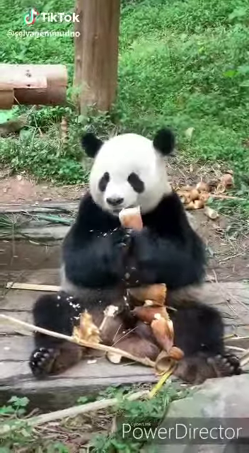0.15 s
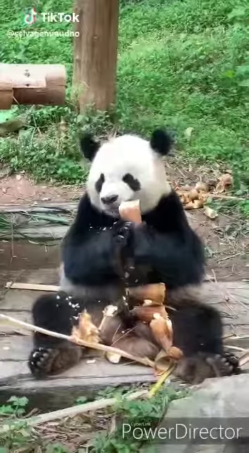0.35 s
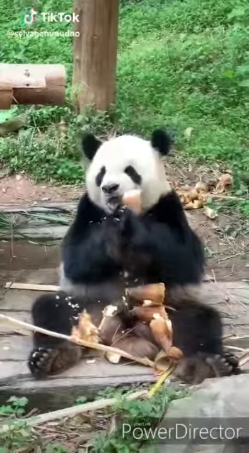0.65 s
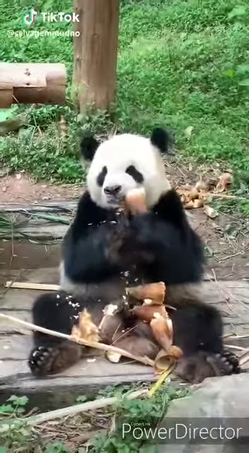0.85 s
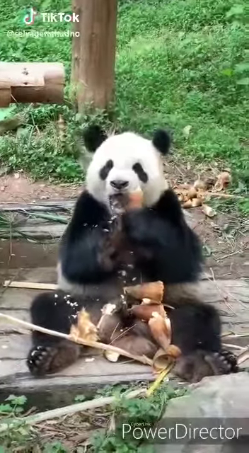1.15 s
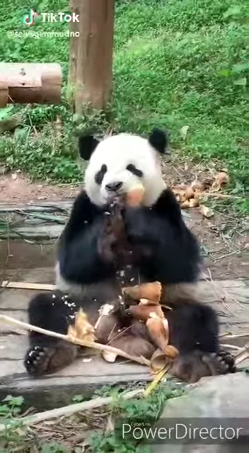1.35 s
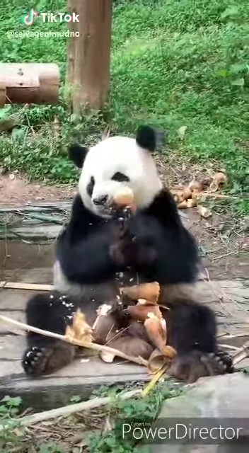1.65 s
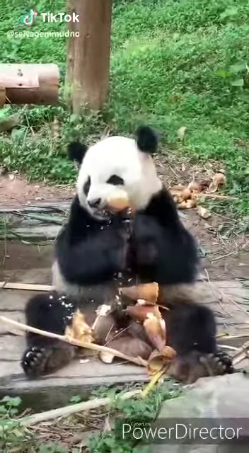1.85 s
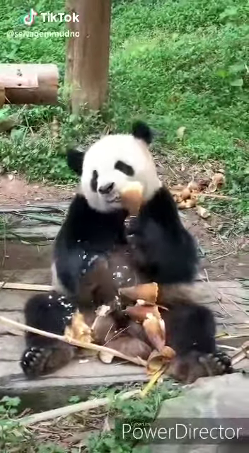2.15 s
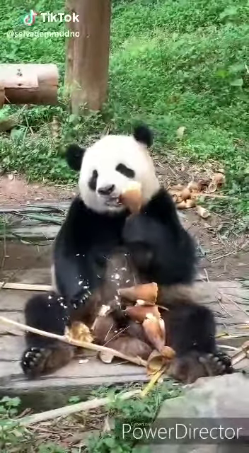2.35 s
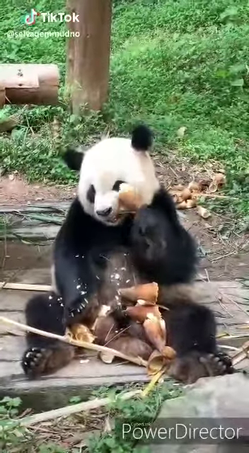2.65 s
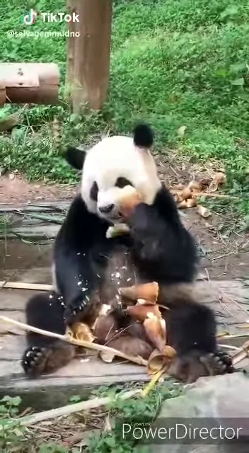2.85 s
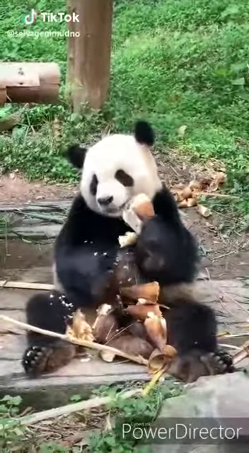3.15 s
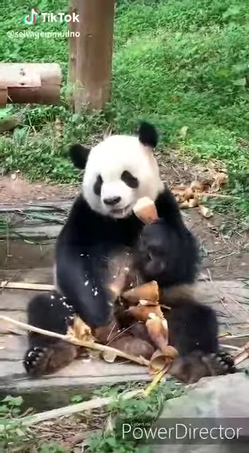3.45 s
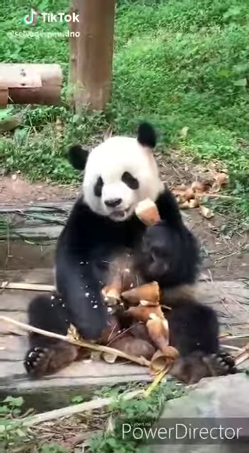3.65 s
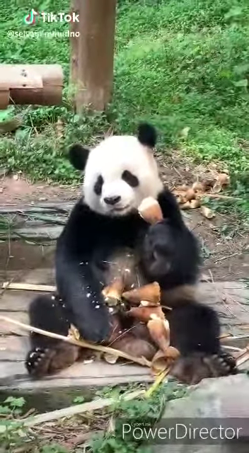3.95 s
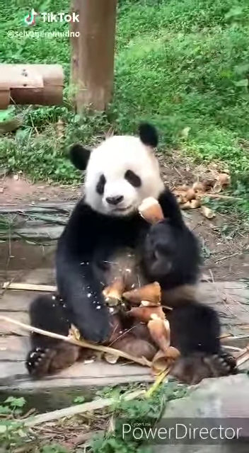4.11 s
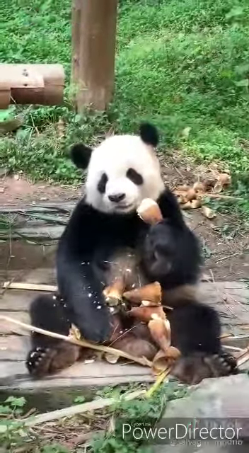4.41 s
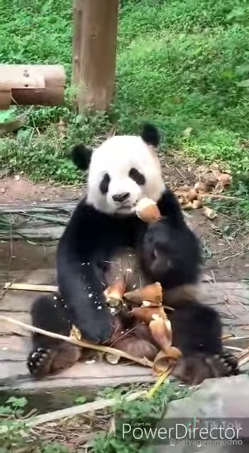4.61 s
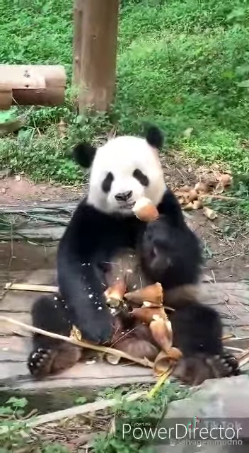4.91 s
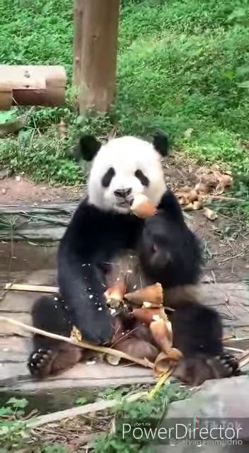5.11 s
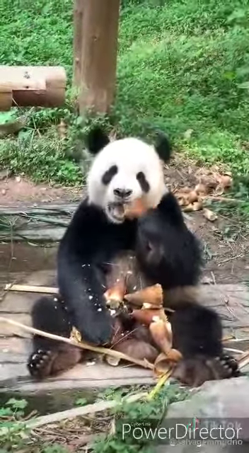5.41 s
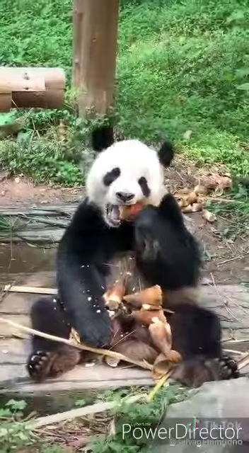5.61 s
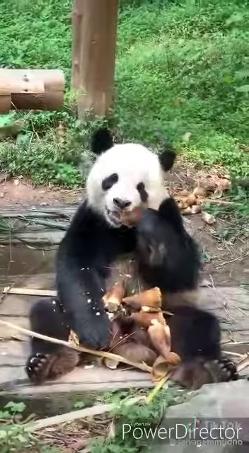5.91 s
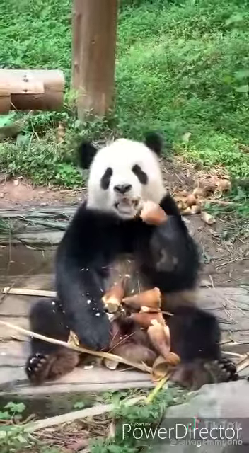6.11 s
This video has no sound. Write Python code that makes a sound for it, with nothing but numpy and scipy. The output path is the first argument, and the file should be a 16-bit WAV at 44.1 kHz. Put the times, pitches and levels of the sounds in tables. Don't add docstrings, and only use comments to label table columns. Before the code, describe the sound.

Crunching, brittle chewing dominates, bright and dry with a small hollow mouth tone. Early nips and snaps thin into softer grinding, then the loudest crack bursts out, followed by sparse chews, a low bump on the microphone and a tight flurry of snaps. Regular crunches finish it. Quiet open-air stereo hiss and far machinery rumble stay beneath, with almost no echo.

```python
import sys
import numpy as np
from scipy import signal
from scipy.io import wavfile
from scipy.ndimage import uniform_filter1d

SR = 44100
rng = np.random.default_rng(int(sys.argv[2]) if len(sys.argv) > 2 else 0)


def unload_wav(signal):
    wavfile.write(
        sys.argv[1],
        SR,
        np.round(np.clip(np.atleast_2d(signal).T, -1, 1) * 32767).astype(np.int16),
    )


def volts(x):
    e = np.asarray(x, float) / 20
    return 10 ** e


N = 276490

# contact in seconds, length in seconds, crush level in dB, cavity level in dB,
# cavity pitch in Hz.
CHEWS = [(0.121, 0.092, -34, -36.5, 1300), (0.752, 0.093, -41, -40, 992), (0.951, 0.066, -36.5, -40, 885),
         (1.11, 0.034, -47, -49, 748), (1.151, 0.11, -50.5, -42, 757), (1.369, 0.087, -44, -41, 840),
         (1.586, 0.048, -49, -55, 990), (1.939, 0.079, -23, -34, 1267), (2.366, 0.084, -47, -44.5, 920),
         (2.546, 0.092, -37, -40, 970), (2.755, .07, -42, -44, 940), (3.453, 0.11, -33.5, -36.5, 1890),
         (4.064, 0.085, -42, -38.5, 1810), (4.482, 0.082, -33, -36, 1310), (4.701, 0.074, -37, -37.5, 1440),
         (4.904, 0.072, -39, -39, 1280), (5.106, 0.085, -37.5, -36.5, 1490), (5.316, 0.12, -46, -42, 1520),
         (5.521, 0.065, -31, -41, 1810), (5.726, 0.076, -42.5, -44, 1430),
         (5.938, 0.035, -37.5, -40.5, 1600), (6.141, 0.1, -42, -40, 1144)]
# [s, s, dB, dB, Hz].
BITES = [(-0.028, 0.3, -41.5, -40, 1030), (0.281, 0.03, -51, -41.5, 1580), (0.351, .055, -46.5, -41, 1060),
         (2.042, 0.074, -36.5, -51, 1210), (3.662, 0.068, -35.5, -36, 1790),
         (4.288, 0.085, -39, -41.5, 1146), (4.335, .04, -42, -46, 1100), (0.548, 0.087, -29.5, -35, 1170),
         (2.982, 0.1, -36, -41, 900), (3.243, 0.073, -27.5, -31, 840), (3.882, 0.07, -26, -34.5, 1730),
         (5.982, 0.027, -37.5, -39, 1190), (5.507, 0.035, -45, -41.5, 1810)]
# [s, s, dB, dB, Hz].
NIPS = [(0.46, 0.0077, -42, -34, 900), (0.38, 0.011, -37, -44.5, 1100), (0.427, 0.0051, -45, -38, 1340),
        (0.462, 0.0047, -50, -38.5, 1730), (0.53, 0.0055, -44, -32.5, 1700), (1.8, 0.028, -48.5, -57, 880),
        (3.183, 0.023, -44, -49, 1405), (1.787, 0.013, -36, -38.5, 1140), (2.347, .012, -40, -40.5, 1400),
        (2.012, .04, -34, -42, 1240), (3.206, 0.006, -28, -28, 2030), (3.215, .004, -26, -29, 1270),
        (3.269, .01, -34, -40, 940), (3.292, 0.0073, -34.5, -36.5, 870), (3.226, 0.013, -24, -31, 1140)]
# peak in seconds, peak level in dB, ring in Hz, cavity knock in dB.
SNAPS = [(0.1666, -17.5, 4480, -36), (0.348, -24.5, 9800, -32), (0.4176, -27.5, 5300, -37),
         (0.4203, -26, 2310, -20), (0.4622, -29, 3280, -28), (0.4893, -33, 6650, -28),
         (0.5443, -14.5, 5800, -22), (0.9601, -28, 10140, -33), (0.9693, -19, 10140, -21.5),
         (1.7888, -28, 5400, -30), (1.7928, -22, 7600, -22), (1.9412, -8, 10800, -10.5),
         (1.9466, -15.5, 5470, -25), (1.954, -6.5, 4550, -11.5), (1.9815, -19, 12000, -23),
         (2.603, -22.5, 5700, -23.5), (2.9967, -13.5, 6740, -22), (3.205, -27, 6000, -26),
         (3.2083, -11, 7500, -18), (3.2095, -15.5, 2400, -22), (3.2155, -17, 6750, -30),
         (3.2257, -26, 6160, -27), (3.2343, -8.5, 7060, -20), (3.2463, -12, 11000, -30),
         (3.2507, -11.5, 5160, -24), (3.2525, -17, 2380, -6), (3.2813, -16, 4970, -23),
         (4.695, -18, 10800, -19.5), (3.4593, -14.5, 11500, -28), (3.506, -26, 5000, -19),
         (3.8805, -20, 5750, -16.5), (4.3087, -26, 5730, -26), (4.5054, -22, 10000, -17),
         (5.5241, -20, 10200, -25), (5.7243, -16, 7800, -24), (5.9884, -19.5, 4400, -26),
         (5.936, -26, 10500, -32)]
# peak in seconds, peak level in dB,
# ring in Hz.
MORE_SNAPS = [(0.1225, -22, 6400), (0.3873, -25, 4800), (0.012, -29, 4050), (0.2834, -35, 3980),
              (0.3415, -33, 10500), (0.429, -34, 9500), (0.487, -30, 5000), (0.537, -20, 11900),
              (0.5716, -23, 6250), (0.5838, -23.5, 9100), (0.791, -26.5, 5240), (1.1211, -28, 11090),
              (1.2888, -34, 11040), (1.5, -36, 5200), (1.9365, -21, 11400), (1.965, -16, 5100),
              (1.97, -18, 11540), (1.975, -19, 11000), (2.0142, -21, 4570), (2.026, -21, 4530),
              (2.032, -20, 12000), (2.0407, -12.5, 3700), (2.352, -28, 10840), (3.2283, -15, 2370),
              (3.227, -17, 5540), (3.2382, -19, 2500), (3.271, -27, 9500), (3.292, -27, 4700),
              (3.449, -29, 11480), (3.4758, -20, 5300), (3.487, -23, 4940), (3.491, -26.5, 4700),
              (3.585, -37, 10500), (3.5952, -35, 11100), (3.884, -14.5, 5290), (3.903, -15, 5760),
              (3.981, -37, 7860), (4.2149, -40, 6130), (4.6977, -23, 10400), (4.71, -25, 8200),
              (4.7215, -27, 10200), (4.7768, -32, 10300), (4.787, -32, 4070), (4.791, -35, 4040),
              (4.919, -22, 10500), (5.5098, -31, 11000), (5.5673, -26.5, 5100)]
# peak in seconds, peak level in dB.
KNOCKS = [(1.102, -24), (1.108, -21.5), (1.143, -28), (1.167, -32), (1.178, -29), (1.189, -25),
          (1.196, -30), (1.9865, -24), (1.4, -24.5), (3.295, -25), (3.66, -38), (4.063, -24), (4.074, -24),
          (4.083, -26), (4.291, -27), (4.907, -22), (5.1051, -27), (6.1467, -15.5)]
# frequency in Hz, density in dB per Hz.
FIBRE_SPECTRUM = [(1290, -32), (2200, 3), (2900, -11.5), (4420, 12), (6710, 6.5), (7310, 2.5), (9070, -3.5),
                  (11600, 5), (13300, -18.5), (14000, -33)]
# time in seconds, level in dB.
HUSK = [
    (0, -47),
    (0.12, -46),
    (0.2, -47),
    (0.262, -49),
    (0.283, -39.5),
    (0.3, -47),
    (0.32, -64),
    (0.34, -90),
]
# side heard (0 left, 1 right), lag in seconds, level in dB.
ECHOES = [(0, 0.0034, -13.5), (1, 0.0043, -25.5), (0, 0.011, -32.5),
          (1, 0.014, -48), (0, 0.022, -51), (1, 0.028, -48)]
# time in seconds, hum pitch in Hz, hum level in dB, rumble level in dB.
DRONE = [(0.0, 51.5, -70, -34.5), (0.16, 62.3, -61, -37.5), (0.44, 61.6, -44, -38), (0.54, 57.5, -42, -41),
         (2.46, 57.84, -42, -39), (2.6, 54, -35, -41.5), (2.79, 57, -44, -38), (3.21, 57, -45.5, -41),
         (4.85, 60.0, -39, -39.5), (4.98, 60.3, -44, -38.5), (5.46, 61.5, -57, -41), (5.55, 62.8, -47, -38),
         (5.83, 61.3, -37.5, -42), (6.16, 62.1, -50, -38), (6.27, 60.3, -40, -40)]
# centre in Hz, width in Hz, level in dB.
HOUSING_MODES = [(97.36, 2.3, -0.5), (139.2, 18.5, -5.5), (234.8, 17.7, -5.5), (294.4, 5.7, -9),
                 (435.7, 8.5, -12.5)]
# frequency in Hz, density in dB per Hz.
AIR_SPECTRUM = [(15, -37), (25, -5.5), (70, -5.5), (113, 2), (363, -12), (554, -11), (991, -19.5),
                (1230, -17), (1780, -20.5), (2570, -24.5), (4250, -27), (8930, -35.5), (10700, -32.5),
                (12600, -60), (14000, -82)]
# frequency in Hz, correlation from -1 to 1.
LIKENESS = [(60, 1.0), (150, 1), (370, 0.74), (910, 0.022), (2250, -0.49), (5580, -0.28), (13800, -0.1)]
# time in seconds, thump level in dB.
GUST = [
    (2.48, -65),
    (2.58, -32.5),
    (2.696, -43),
    (2.75, -50),
]

CHEW_RISE_S, CHEW_HOLD_SHARE, CHEW_SAG_DB, CHEW_FALL_DB = 0.011, 0.4, 2.5, 15
BITE_RISE_S, BITE_HOLD_SHARE, BITE_SAG_DB, BITE_FALL_DB = 0.025, 0.5, 9, 20.5
NIP_RISE_S, NIP_HOLD_SHARE, NIP_SAG_DB, NIP_FALL_DB = 0.0045, 0.86, -1.5, 24
ONSET_DB = 24
MOUTH_FADE_DB_PER_S = 29
BRIGHT_DB, DULLING_DB_PER_S = -0.6, 38.5
FRONT_DULL_DB = 1
CONTACT_DB, CONTACT_HZ, CONTACT_KNOCK_DB = 4.5, 10500, 7
TICK_KNOCK_DB = -34
KNOCK_RING_S, KNOCK_CRACK_DB = 0.0016, -25.5
THROAT_HZ, THROAT_DB, THROAT_KNOCK_DB = 773, -5.5, -4.5
HUSK_HZ, HUSK_WIDTH_HZ = 3420, 1700


def rms_one(x):
    return x / np.sqrt(np.mean(x ** 2) + 1e-20)


def in_time(rows):
    s, *columns = np.transpose(rows)
    return [np.interp(np.arange(N) / SR, s, c) for c in columns]


def at_hz(points, hz):
    point_hz, value = np.transpose(points)
    return np.interp(np.log(hz), np.log(point_hz), value)


def drift(rate_hz):
    r = np.exp(-2 * np.pi * rate_hz * 40 / SR)
    slow = signal.lfilter([1], [1, -2 * r, r * r], rng.standard_normal(N // 40 + 2002))[2000:]
    return np.interp(np.arange(N) / 40, np.arange(len(slow)), rms_one(slow))


def resonate(x, hz, width_hz):
    r = np.exp(-np.pi * width_hz / SR)
    poles = [1, -2 * r * np.cos(2 * np.pi * hz / SR), r * r]
    return signal.lfilter([(1 - r * r) / 2, 0, (r * r - 1) / 2], poles, x + 1e-18)


def band_noise(white, low_hz, high_hz):
    return signal.sosfilt(signal.butter(2, [low_hz, high_hz], "band", fs=SR, output="sos"), white)


def clicks(per_s, spread_db):
    sizes = volts(spread_db * np.minimum(rng.exponential(1, N), 4)) * rng.choice([-1, 1], N)
    return sizes * (rng.random(N) < per_s / SR)


def strokes(rows, rise_s, hold_share, sag_db, fall_db):
    out, t = np.zeros((2, N)), np.arange(N) / SR
    for s, length_s, crush_db, mouth_db, _ in rows:
        on = slice(max(round((s - rise_s) * SR), 0), round((s + length_s) * SR))
        corners_s = s + np.array([-rise_s, 0, hold_share * length_s, length_s])
        shape_db = np.interp(t[on], corners_s, [-ONSET_DB, 0, -sag_db, -fall_db])
        mouth_fade_db = MOUTH_FADE_DB_PER_S * np.maximum(t[on] - s, 0)
        out[0, on] += volts(shape_db + crush_db)
        out[1, on] += volts(shape_db + mouth_db - mouth_fade_db)
    return uniform_filter1d(out, size=100, axis=1)


def jaw():
    force, mouth = (strokes(CHEWS, CHEW_RISE_S, CHEW_HOLD_SHARE, CHEW_SAG_DB, CHEW_FALL_DB)
                    + strokes(BITES, BITE_RISE_S, BITE_HOLD_SHARE, BITE_SAG_DB, BITE_FALL_DB)
                    + strokes(NIPS, NIP_RISE_S, NIP_HOLD_SHARE, NIP_SAG_DB, NIP_FALL_DB))
    rows, t = np.array(sorted(CHEWS + BITES + NIPS)), np.arange(N) / SR
    last = np.maximum(np.searchsorted(rows[:, 0] - CHEW_RISE_S, t) - 1, 0)
    contact_s, mouth_hz = rows[last, 0], rows[last, 4]
    bright_db = BRIGHT_DB - DULLING_DB_PER_S * np.maximum(t - contact_s, 0)
    bright_db -= FRONT_DULL_DB * ~np.isin(contact_s, np.array(CHEWS)[:, 0])
    return force, mouth, mouth_hz, bright_db


def crush(force, bright_db, alike=0.34):
    burst = volts(2.8 * drift(120))
    dull_db = 10 * np.log10(np.clip(1 - volts(bright_db) ** 2, 0.03, 1))
    shared, count = clicks(9000, 3.2), 20
    both = np.array([alike * shared + (1 - alike) * clicks(9000, 3.2) for side in range(2)])
    dealt = rng.integers(0, count, N)
    dull, bright = np.zeros((2, N)), np.zeros((2, N))
    for k, hz in enumerate(np.geomspace(2400, 13000, count)):
        mode = rms_one(resonate(both * (dealt == k), hz, hz * 0.1))
        half = bright if hz > 8000 else dull
        half += volts(at_hz(FIBRE_SPECTRUM, hz)) * np.sqrt(hz) * mode
    mix = volts(dull_db) * rms_one(dull) + volts(bright_db) * rms_one(bright)
    return force * burst * volts(-0.7) * mix


def cavity(mouth, mouth_hz):
    out, count = 0, 12
    dealt = rng.integers(0, count, N)
    own = np.array([clicks(4000, 2.5), clicks(4000, 2.5)])
    grains = clicks(4000, 2.5) + 0.45 * own
    for k, hz in enumerate(np.geomspace(520, 2500, count)):
        near = volts(np.maximum(-100 * np.log2(hz / mouth_hz) ** 2, -17))
        throat = volts(THROAT_DB - 206 * np.log2(hz / THROAT_HZ) ** 2)
        out = out + (near + throat) * rms_one(resonate(grains * (dealt == k), hz, hz * 0.12))
    return np.minimum(mouth, volts(-27)) * volts(-4) * out


def fractures():
    further = [(s, db, hz, db + TICK_KNOCK_DB) for s, db, hz in MORE_SNAPS]
    hollow = [(s, db + KNOCK_CRACK_DB, CONTACT_HZ, db) for s, db in KNOCKS]
    teeth = [(s, crush_db + CONTACT_DB, CONTACT_HZ, mouth_db + CONTACT_KNOCK_DB)
             for s, _, crush_db, mouth_db, _ in CHEWS]
    return SNAPS + further + hollow + teeth


def snaps(mouth_hz):
    size = 900
    out, t = np.zeros((2, N + size)), np.arange(size) / SR
    attack = np.minimum(t / 0.0011, 1) ** 2
    for s, peak_db, ring_hz, knock_db in fractures():
        at = round((s - 0.0012) * SR)
        noise = 0.65 * rng.standard_normal(size) + rng.standard_normal((2, size))
        burst = noise * attack * np.exp(-t / 0.00072)
        crack = 0.32 * burst + 2.2 * resonate(burst, ring_hz, 600 + 0.095 * ring_hz)
        high_pass = signal.butter(3, min(0.5 * ring_hz, 3400), "high", fs=SR, output="sos")
        crack = signal.sosfilt(high_pass, crack)
        crack = crack / np.abs(crack).max(axis=1, keepdims=True)
        throat = volts(THROAT_KNOCK_DB) * np.sin(2 * np.pi * THROAT_HZ * t)
        hollow = np.sin(2 * np.pi * mouth_hz[at] * t) + throat
        knock = hollow * attack * np.exp(-t / KNOCK_RING_S)
        out[:, at:at + size] += volts(peak_db + 4) * crack + volts(knock_db - 0.5) * knock
    return out[:, :N]


def yard(x):
    out = np.zeros((2, N))
    for side, lag_s, echo_db in ECHOES:
        lag = round(lag_s * SR)
        out[side, lag:] += volts(echo_db) * x[1 - side, :-lag]
    return out


def husk():
    grains = 0.5 * clicks(3000, 4) + np.array([clicks(3000, 3.4), clicks(3000, 2.8)])
    return volts(in_time(HUSK)[0]) * rms_one(resonate(grains, HUSK_HZ, HUSK_WIDTH_HZ))


def gust():
    low = band_noise(rng.standard_normal(N), 25, 160)
    t = np.arange(N) / SR
    blowing = (t > GUST[0][0]) & (t < GUST[-1][0])
    return volts(in_time(GUST)[0] + 2) * rms_one(low) * blowing


def drone(hum_hz, hum_db, rumble_db):
    phase = 2 * np.pi * np.cumsum(hum_hz + 0.83 * drift(1.37)) / SR
    hum = np.sqrt(2) * np.sin(phase) * volts(hum_db + 1.3 * drift(5.7))
    white = rng.standard_normal(N)
    body = sum(volts(level_db) * rms_one(resonate(white, hz, width_hz))
               for hz, width_hz, level_db in HOUSING_MODES)
    return hum + volts(rumble_db - 6) * body


def air(patchy_db):
    out, edges_hz = 0, 25 * 2 ** np.arange(0, 9.4, 0.5)
    white = rng.standard_normal((2, 2, N))
    for k, (low_hz, high_hz) in enumerate(zip(edges_hz, edges_hz[1:])):
        mid, side = band_noise(white[k % 2], low_hz, high_hz)
        hz = np.sqrt(low_hz * high_hz)
        alike = np.clip(at_hz(LIKENESS, hz), -1, 0.997)
        gain = volts(at_hz(AIR_SPECTRUM, hz) + patchy_db * drift(33) * min(hz / 3000, 1))
        out = out + gain * (np.sqrt(1 + alike) * mid + np.sqrt(1 - alike) * side * [[1], [-1]])
    return rms_one(out)


def scene():
    force, mouth, mouth_hz, bright_db = jaw()
    hum_hz, hum_db, rumble_db = in_time(DRONE)
    chewing = crush(force, bright_db) + cavity(mouth, mouth_hz) + snaps(mouth_hz)
    air_db = -38 + 0.3 * (rumble_db + 37)
    background = volts(air_db) * air(patchy_db=5) + drone(hum_hz, hum_db, rumble_db) + gust()
    return chewing + yard(chewing) + background + husk()


def low_pass(x):
    return signal.sosfilt(signal.butter(12, 14400, fs=SR, output="sos"), x)


def record(dry):
    cut = signal.sosfilt(signal.butter(10, 13100, fs=SR, output="sos"), dry)
    mix = 1.277 * np.tanh(cut / 1.127)
    return low_pass(mix)


dry = scene()
out = record(dry)
unload_wav(out)
```